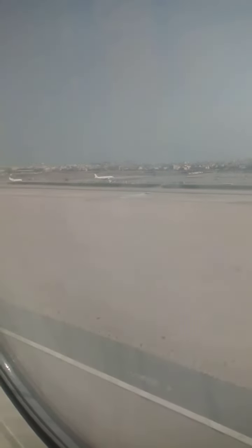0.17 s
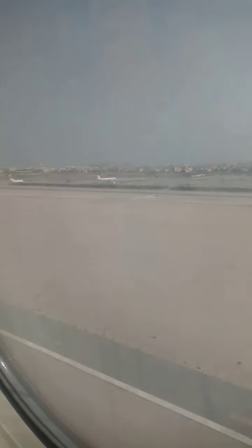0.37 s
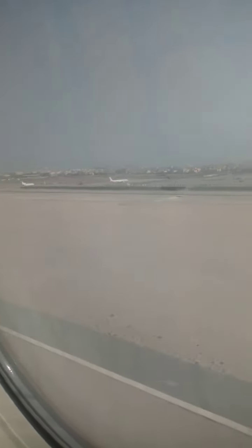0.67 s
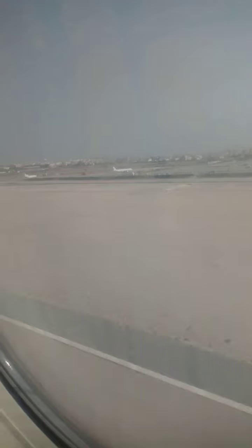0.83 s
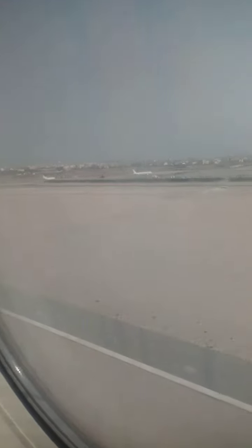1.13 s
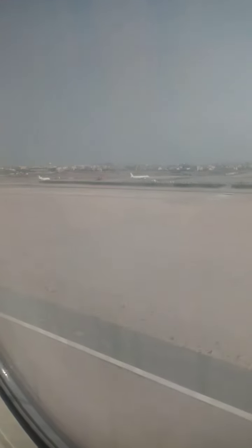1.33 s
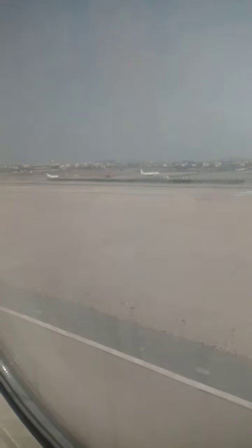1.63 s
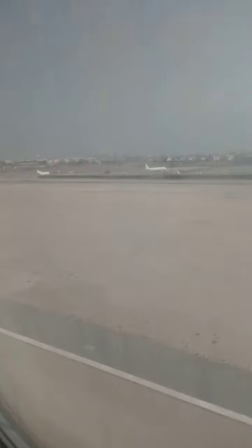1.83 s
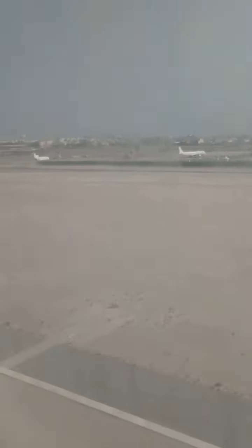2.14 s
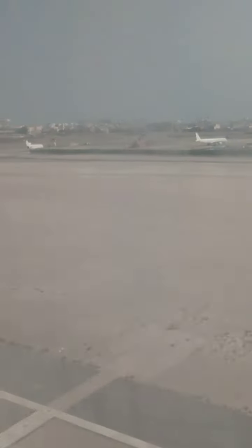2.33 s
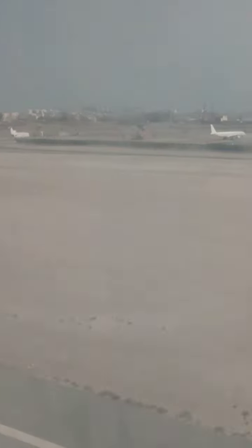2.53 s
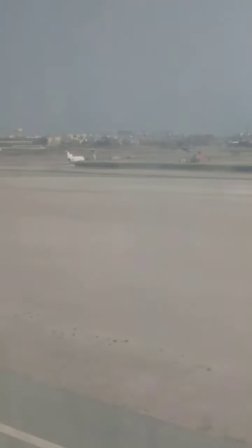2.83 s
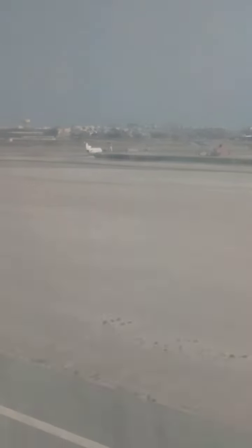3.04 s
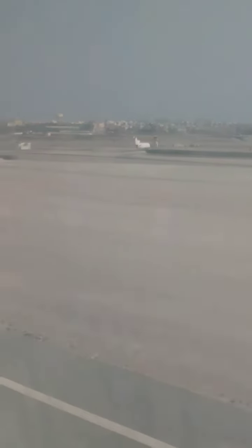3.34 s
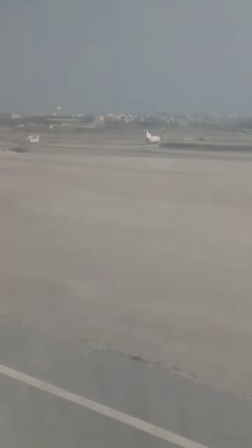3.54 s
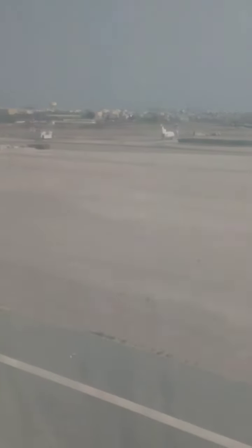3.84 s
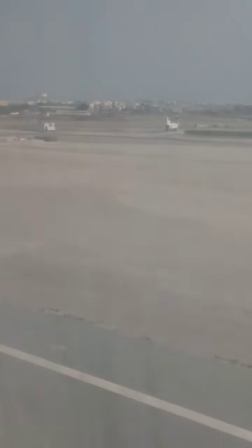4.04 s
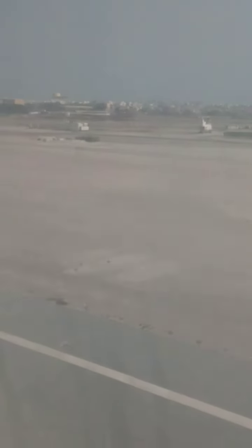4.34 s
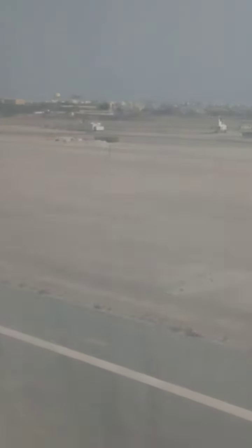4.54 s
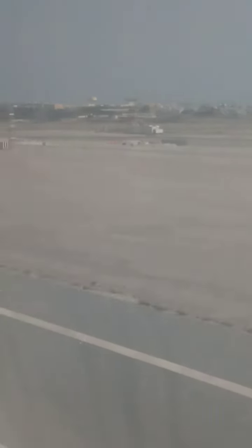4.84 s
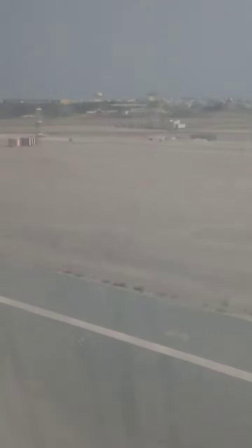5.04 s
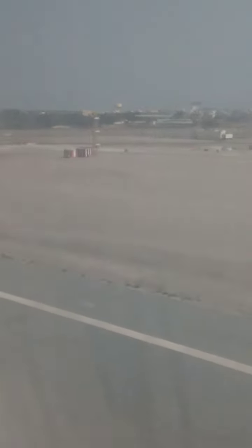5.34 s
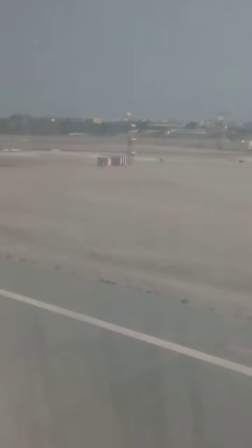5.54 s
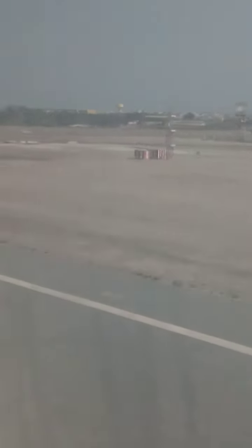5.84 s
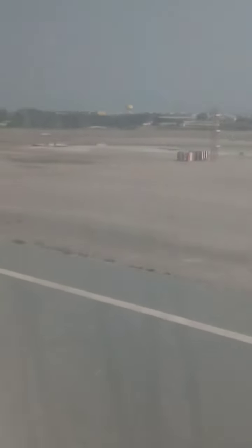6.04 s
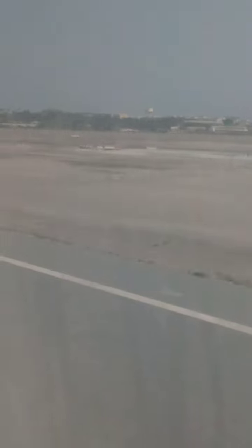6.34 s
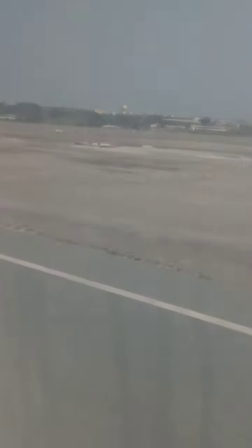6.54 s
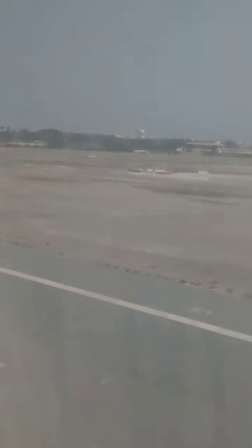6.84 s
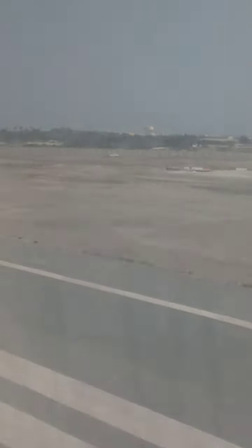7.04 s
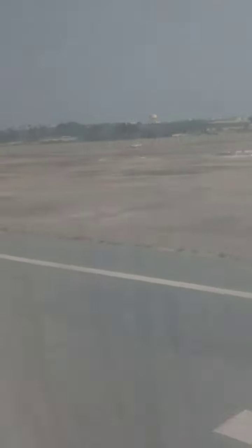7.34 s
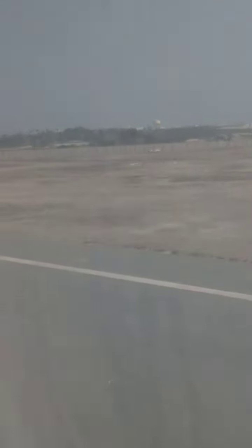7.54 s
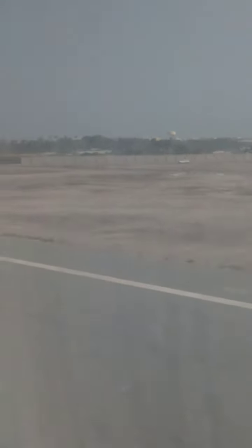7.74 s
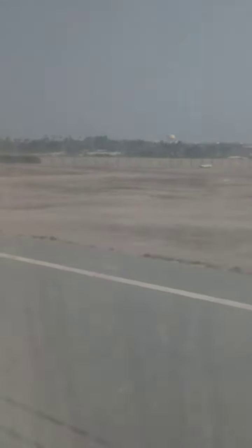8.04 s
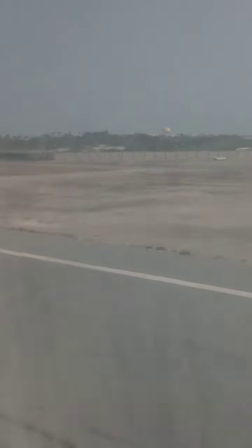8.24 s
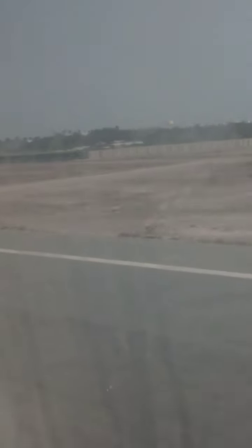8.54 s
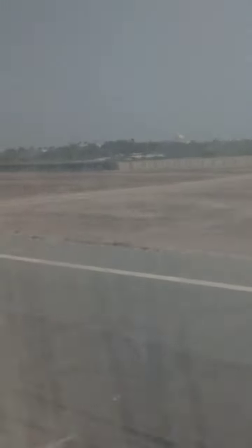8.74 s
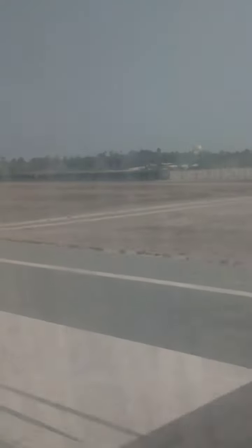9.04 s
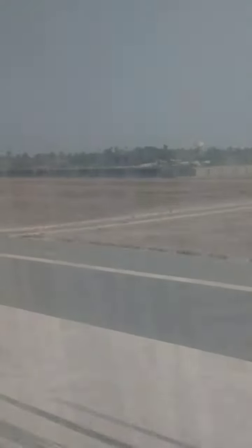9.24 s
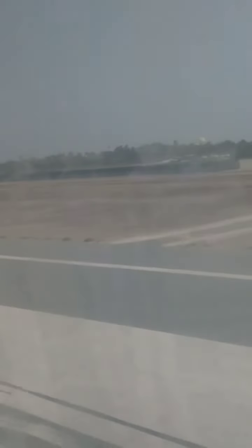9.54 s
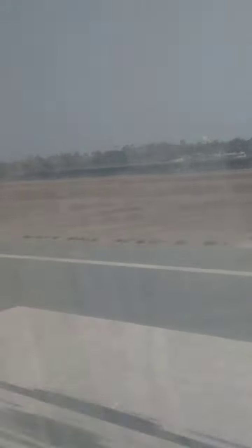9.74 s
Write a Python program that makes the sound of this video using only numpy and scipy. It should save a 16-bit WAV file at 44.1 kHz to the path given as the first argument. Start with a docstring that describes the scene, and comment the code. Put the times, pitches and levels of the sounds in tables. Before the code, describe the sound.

A phone at an airliner window seat picks up a steady, dull roar of wheels, engines and air through the cabin wall, with a low hum and faint wavering whine. Early on, fingers squeak on the phone, cloth rustles and panels knock. After six seconds the throttle closes, the hum drops and the whine slides slowly down.

```python
"""Inside an airliner rolling down the runway, heard on a phone held at a window seat.
From the start wheels, engines and air roar dully (coloured noise) over fan and core tones (wavering sines).
Soon plastic ticks and panels knock (decaying noise bursts), on and off until about eight seconds; early on,
fingers rub the phone and cloth slides (grainy noise with squeaks).
Past six seconds the throttle closes: the whine sinks."""
import sys
import numpy as np
from scipy import signal
from scipy.fft import rfft, irfft
from scipy.io import wavfile
from scipy.ndimage import map_coordinates

SR = 44100
rng = np.random.default_rng(int(sys.argv[2]) if len(sys.argv) > 2 else 0)


def pcm_store(signal):
    """Save signal as 16-bit PCM."""
    levels = np.round(np.clip(np.atleast_2d(signal), -1, 1) * 32767)
    wavfile.write(sys.argv[1], SR, levels.astype(np.int16).T)


N = 436590
T = np.arange(N) / SR
BINS_HZ = np.maximum(np.arange(N // 2 + 1) * SR / N, 1)

# Colour tables; only the shape counts, each noise gets its own level.
# roar through the cabin wall, body: freq_hz, density_db
BODY_COLOUR = [(10, -26), (32, -32.5), (47, -6.5), (63, -9.5), (85, -2), (125, -2.5), (150, -5),
               (200, -4.5), (240, -8), (335, -7.5), (385, -14.5), (500, -16.5), (700, -24), (1000, -33)]
# roar through the cabin wall, thin hiss above the body: freq_hz, density_db
WASH_COLOUR = [(500, -17.5), (700, -22.5), (1000, -30.5), (1250, -36.5), (1500, -45.5), (1680, -54),
               (1830, -64), (2600, -69), (3000, -74.5), (3900, -75), (5800, -78), (8000, -83),
               (13800, -84.5), (15300, -77.5)]
# cracking plastic: freq_hz, density_db
TICK_COLOUR = [(500, 2), (1000, 3.5), (1750, 9.5), (2200, -3), (2800, -4.5), (3300, -22), (4500, -25),
               (5500, -25), (7500, -33.5), (13500, -37), (15200, -18)]
# knocked cabin panel: freq_hz, density_db
THUD_COLOUR = [(100, -7.5), (250, 4), (650, 2), (1000, -8), (1400, -15), (1750, -21), (2100, -34.5),
               (2700, -38.5), (3500, -56.5), (6000, -73.5)]
# rubbed phone case: freq_hz, density_db
STROKE_COLOUR = [(900, -15), (1500, 6.5), (1850, -2), (2150, -1), (2300, -6), (2450, -0.5), (2800, -2),
                 (3150, -20.5), (3700, -10.5), (4400, -25), (5400, -23), (6200, -27.5), (7200, -39),
                 (14000, -35.5)]
# sliding fabric: freq_hz, density_db
RUSTLE_COLOUR = [(400, -0.5), (700, 5.5), (1100, 10), (1550, 6), (2000, -7.5), (2250, -11), (2800, -9.5),
                 (3150, -21.5), (3700, -33.5), (6000, -45), (15000, -45.5)]

# cabin air and panel resonances in the roar: centre_hz, width_hz, lift_db
CABIN_PEAKS = [(118.6, 14, 1.5), (182, 19, 3.5), (272, 32, 4), (352, 7.7, 2), (422, 49, 1), (518, 27, 1.5),
               (645, 27, 3), (844, 40, 1.5), (1257, 76, 3.5)]
# cabin resonances the whine sweeps through: centre_hz, width_hz, lift_db
WHINE_PEAKS = [(1632.5, 15, 16), (1410, 80, 13), (1267, 62, 24), (1025, 70, 5.5)]
# brief swells and dips of the low rumble and roar: start_s, length_s, rumble_lift_db, roar_lift_db
ROAR_SWELLS = [(0.416, 0.25, 2.3, -1), (0.717, 0.32, -3.5, 1), (1.233, 0.24, 2.5, 0),
               (2.148, 0.36, -0.5, 2), (3.752, 0.38, 3, 1.5), (4.152, 0.44, 1, 1),
               (4.653, 0.14, -2.5, -3.5), (5.3, 0.087, 0.5, 1), (6.24, .06, -2.5, 1.5), (7.1, 0.4, -2, 3),
               (8.154, 0.16, 4, -0.5), (8.325, 0.13, -5, -0.5), (8.774, .12, 2.5, -2), (9.248, 0.1, -6, 4),
               (9.423, .22, -1.5, -1.5)]
# swells of the rush's upper edge: start_s, length_s, lift_db
EDGE_SWELLS = [(4.55, .16, 4.5), (6.677, 0.058, 5.5), (6.86, 0.17, 2.5), (7.32, 0.23, 5.5)]
# plastic ticks: start_s, level_db, t60_s, snap_level_db
TICKS = [(.618, -56, 0.027, -86), (5.349, -53.5, 0.042, -82), (5.396, -63.5, .02, -83),
         (5.596, -68, .02, -91), (6.342, -65, .025, -79.5), (7.817, -58.5, 0.024, -75)]
# panel knocks: start_s, level_db, t60_s
KNOCKS = [(1.387, -23, .022), (1.864, -27.5, .022), (2.549, -25.5, .022), (5.349, -31, 0.027),
          (6.342, -36, 0.034)]
# finger strokes; last three levels relative to level_db, ring_hz reached at full pressure:
# start_s, length_s, level_db, rise_share, bright_db, ring_hz, ring_db, hiss_db, port_db
STROKES = [(0.682, 0.032, -54, .45, -1, 2340, -1, -27, -3.5),
           (0.707, 0.047, -56.5, 0.4, 1.5, 2550, -4, -26, -11),
           (0.744, .046, -55, 0.2, -3, 2400, -7, -20, -14),
           (0.79, 0.052, -54.5, .55, -5.5, 2150, -10.5, -28, -25),
           (0.837, .08, -60.5, .1, -6, 2650, -14, -23, -19),
           (2.688, 0.071, -65, 0.34, -4, 2750, -11, -27, -17),
           (2.847, 0.14, -71, .4, -3.5, 2300, -12, -21, -12)]
# cloth rubs; ring_db relative to level_db, ring_hz reached at full pressure:
# start_s, length_s, level_db, rise_share, bright_db, ring_hz, ring_db
RUSTLES = [(1.42, 0.19, -51.5, 0.57, -2, 2040, -14), (1.6, 0.16, -55, 0.6, -1, 2060, -14),
           (1.856, 0.046, -50, 0.3, 0, 2800, -15), (1.88, 0.088, -46, 0.4, 0, 2440, -12.5),
           (1.955, 0.14, -52, 0.1, -2.5, 1510, -7), (2.188, 0.16, -55, 0.7, -5, 2580, -19),
           (2.398, .05, -60, 0.5, -0.5, 1690, -2.5), (2.53, .09, -57.5, 0.4, -1, 1800, -11),
           (2.82, .2, -68.5, 0.46, -10, 1980, -4)]
# hardest shove against the panel: start_s, length_s, level_db
SHOVE = (1.865, .08, -38.5)

# rms levels before swells and buffeting; drift and buffeting are random spreads
WHEELS_DB, ENGINES_DB, AIR_DB = -28.0, -28.5, -44.5
DRIFT_DB, BUFFET_DB, EDGE_FLUTTER_DB = 0.04, 0.5, 1.94
# band edges of the roar
LOW_HZ, MID_HZ, HIGH_HZ, HISS_HZ, TREBLE_HZ = 160, 600, 1350, 1800, 3000
# blade-pass pitch, approached from SETTLE_SHARE below; COAST_S is the run-down time constant
FAN_HZ, SETTLE_SHARE, SETTLE_S = 1652, 0.019, 1.0
THROTTLE_BACK_S, EASE_S, COAST_S = 6.33, 0.15, 6.4
# whine at full speed before the resonances; the wall passes more as pitch sinks
WHINE_DB, WALL_DB_PER_OCTAVE = -84, 15
# core hum at the start, its slow fade, and its further drop after the throttle closes
CORE_HZ, CORE_DB, CORE_FADE_DB_PER_S, CORE_DROP_DB, CORE_DROP_S = 215.8, -34.5, 0.73, 11, 0.93
CORE_FOLLOW = 0.26  # core speed falls as this power of the fan's coast
SNAP_HZ, SNAP_WIDTH_HZ = 5400, 2200
# squeak pitch at first touch lies this share below ring_hz; spread of the uneven catching
PRESS_BEND, CATCH_DB = 0.15, 1
TOP_HZ = 15720


def undb(db):
    """Decibels to gain."""
    return 10 ** (np.asarray(db) / 20)


def unit(x):
    """Scale to rms 1."""
    return x / np.sqrt(np.mean(x ** 2))


def colour(points):
    """Gain per bin, interpolated over log frequency from (freq_hz, density_db)."""
    hz, db = np.transpose(points)
    return undb(np.interp(np.log(BINS_HZ), np.log(hz), db))


def shape(x, gain):
    """Filter by a gain per bin, without phase shift."""
    return irfft(rfft(x) * gain, N)


def below(hz, order=8):
    """Butterworth low-pass gain per bin."""
    return 1 / np.sqrt(1 + (BINS_HZ / hz) ** (2 * order))


def above(hz, order=8):
    """Power-complementary high-pass gain per bin."""
    return np.sqrt(1 - below(hz, order=order) ** 2)


def bell(hz, width_hz, at_hz=BINS_HZ):
    """Resonance curve, 1 at its centre."""
    return 1 / (1 + (2 * (at_hz - hz) / width_hz) ** 2)


def noise(gain):
    """Gaussian noise of a given colour, rms 1."""
    return unit(shape(rng.standard_normal(N), gain))


def walk(rate_hz):
    """Random curve of spread 1, swinging about rate_hz times a second."""
    steps = rng.standard_normal(size=8192)
    # sqrt(3/2) restores the spread lost between steps
    return np.sqrt(3 / 2) * np.interp(2 * rate_hz * T, np.arange(len(steps)), steps)


def swell(start_s, length_s, rise_share):
    """Envelope 0 to 1 to 0: builds for a share of its length, then lets go."""
    rise_share = np.clip(rise_share, 0.05, 0.95)
    peak_s = start_s + rise_share * length_s
    return np.interp(T, [start_s, peak_s, start_s + length_s], [0, 1, 0]) ** 0.53


def patchy(x, width_hz, rate_hz, spread_db):
    """Let each strip of the spectrum flicker on its own; rms 1."""
    hz, at_s, spectrum = signal.stft(x, SR, nperseg=512)
    rows, columns = np.meshgrid(hz / width_hz, at_s * rate_hz, indexing="ij")
    grid = rng.standard_normal((256, 1024))
    chance = map_coordinates(grid, [rows, columns], order=1, mode="wrap")
    flickered = signal.istft(spectrum * undb(spread_db * chance), SR)[1]
    return unit(flickered[:N])


def coasting():
    """Seconds since the throttle closed, easing in from zero."""
    return EASE_S * np.logaddexp(0, (T - THROTTLE_BACK_S) / EASE_S)


def fan_speed():
    """Share of full fan speed: settles, holds, then coasts down exponentially."""
    settling = 1 - SETTLE_SHARE * np.exp(-T / SETTLE_S)
    return settling * np.exp(-coasting() / COAST_S)


def cabin_gain():
    """Cabin air and panels ring: their lifts add in dB."""
    return undb(sum(lift_db * bell(hz, width_hz) for hz, width_hz, lift_db in CABIN_PEAKS))


def body_gain():
    """Wall-filtered body of the roar, lifted at the cabin resonances."""
    return colour(BODY_COLOUR) * cabin_gain()


def wash_gain():
    """Wall-filtered hiss of the roar, lifted at the cabin resonances."""
    return colour(WASH_COLOUR) * cabin_gain()


def wheels(drift_db):
    """Wheel rumble: lowest band of the roar, swelling, dipping and randomly buffeted."""
    swell_db = sum(rumble_db * swell(start_s, length_s, 0.34)
                   for start_s, length_s, rumble_db, _ in ROAR_SWELLS)
    rumble = noise(body_gain() * below(LOW_HZ))
    return rumble * undb(WHEELS_DB + swell_db + drift_db + BUFFET_DB * walk(9.5))


def engines(drift_db):
    """Engine roar: middle band of the body, swelling, dipping and randomly buffeted."""
    swell_db = sum(roar_db * swell(start_s, length_s, 0.34)
                   for start_s, length_s, _, roar_db in ROAR_SWELLS)
    roar = noise(body_gain() * above(LOW_HZ) * below(MID_HZ))
    return roar * undb(ENGINES_DB + swell_db + drift_db + BUFFET_DB * walk(6))


def air(drift_db):
    """Rushing air: patchy noise above the engine roar."""
    rush = noise(wash_gain() * above(MID_HZ) * below(HIGH_HZ, order=16))
    rush = patchy(rush, width_hz=90, rate_hz=18, spread_db=2.0)
    return rush * undb(AIR_DB + drift_db + 0.62 * walk(12))


def upper_rush():
    """Upper edge of the rush: unevenly flickering noise that weakens as the whine sinks."""
    edge = noise(wash_gain() * above(HIGH_HZ, order=16) * below(HISS_HZ, order=16))
    edge = patchy(edge, width_hz=90, rate_hz=20, spread_db=7)
    swell_db = sum(lift_db * swell(start_s, length_s, 0.35)
                   for start_s, length_s, lift_db in EDGE_SWELLS)
    return edge * undb(-63.5 + swell_db + EDGE_FLUTTER_DB * walk(15)) * fan_speed() ** 1.3


def hiss():
    """Thin hiss through the wall: lower part flickers, treble is steady."""
    lower = noise(wash_gain() * above(HISS_HZ, order=16) * below(TREBLE_HZ, order=16))
    lower = patchy(lower, width_hz=130, rate_hz=22, spread_db=4.0)
    treble = noise(wash_gain() * above(TREBLE_HZ, order=16))
    return lower * undb(-79.5 + 0.9 * walk(14)) + treble * undb(-83.0)


def tone(hz, level_db, waver_share, flutter_db):
    """Rotor line: a sine whose pitch and level waver, as through turbulence."""
    phase = 2 * np.pi * np.cumsum(hz * (1 + waver_share * walk(14))) / SR
    return np.sqrt(2) * np.sin(phase) * undb(level_db + flutter_db * walk(12))


def rotors():
    """Blade-pass whine, two lower orders of the fan shaft and the core hum."""
    speed, coast_s = fan_speed(), coasting()
    fan_hz = FAN_HZ * speed
    shaft_hz = fan_hz / 18
    peaks_db = sum(lift_db * bell(hz, width_hz, fan_hz) for hz, width_hz, lift_db in WHINE_PEAKS)
    whine_db = WHINE_DB - WALL_DB_PER_OCTAVE * np.log2(speed) + peaks_db
    core_hz = CORE_HZ * np.exp(-CORE_FOLLOW * coast_s / COAST_S)
    drop_db = CORE_DROP_DB * (1 - np.exp(-coast_s / CORE_DROP_S))
    core_db = CORE_DB - CORE_FADE_DB_PER_S * T - drop_db
    whine = tone(fan_hz, whine_db, waver_share=0.0018, flutter_db=3.5)
    # third shaft order; its level follows the core's
    drone = tone(3 * shaft_hz, core_db - 9.5, waver_share=0.012, flutter_db=3.5)
    # tenth shaft order sings out briefly as it sinks
    glide = tone(10 * shaft_hz, -53, waver_share=0.0068, flutter_db=1.0) * swell(6.7, 0.44, 0.42)
    core = tone(core_hz, core_db, waver_share=0.005, flutter_db=2.5)
    return whine + drone + glide + core


def blows(rows, gain):
    """Each (start_s, level_db, t60_s): one contact and a dying rattle through a coloured body."""
    force, rattle = np.zeros(N), rng.standard_normal(N)
    for start_s, level_db, t60_s in rows:
        first = int(start_s * SR)
        span = slice(first, first + SR // 10)
        decay = undb(level_db - 60 * (T[span] - T[first]) / t60_s)
        force[span] += decay * rattle[span]
        # the contact carries as much energy as the rattle
        force[first] += np.linalg.norm(decay)
    return shape(force, unit(gain))


def fittings():
    """Plastic fittings crack, each with a crisp snap on top."""
    crack_rows = [(start_s, level_db, t60_s) for start_s, level_db, t60_s, _ in TICKS]
    snap_rows = [(start_s, snap_db, t60_s) for start_s, _, t60_s, snap_db in TICKS]
    snap_gain = bell(SNAP_HZ, SNAP_WIDTH_HZ) ** 2
    return blows(crack_rows, colour(TICK_COLOUR)) + blows(snap_rows, snap_gain)


def friction(rows, points, grain_db, patchy_db):
    """Dense tiny slips under each stroke, catching unevenly; bright_db sets the upper slips."""
    slips = rng.standard_normal(N) * undb(grain_db * walk(260) + CATCH_DB * walk(40))
    # the contact point wanders, so the colour keeps shifting
    rub = patchy(shape(slips, colour(points)), width_hz=150, rate_hz=45, spread_db=patchy_db)
    upper = shape(rub, above(2100, order=3) ** 2)
    out = np.zeros(N)
    for start_s, length_s, level_db, rise_share, bright_db, *_ in rows:
        pressure = swell(start_s, length_s, rise_share)
        out += pressure * undb(level_db) * (rub + (undb(bright_db) - 1) * upper)
    return out


def squeaks(rows):
    """Each rub scrapes at its own resonance, whose pitch follows the pressure."""
    out = np.zeros(N)
    for start_s, length_s, level_db, rise_share, _, ring_hz, ring_db, *_ in rows:
        pressure = swell(start_s, length_s, rise_share)
        on = pressure > 0
        pitch_hz = ring_hz * (1 + PRESS_BEND * (pressure[on] - 1))
        phase = 2 * np.pi * np.cumsum(pitch_hz) / SR
        out[on] += pressure[on] * undb(level_db + ring_db) * np.sin(phase)
    # random swing in strength and sign roughens the sines
    return np.sqrt(2) * walk(170) * out


def handling():
    """Fingers rub the case with squeak and thin hiss and, so near, ring the microphone's tiny port."""
    port = noise(bell(15350, 800) ** 1.5) * undb(2.2 * walk(200))
    skin = noise(bell(5450, 900) ** 2) * undb(3.3 * walk(120))
    treble = np.zeros(N)
    for start_s, length_s, level_db, rise_share, *_, hiss_db, port_db in STROKES:
        pressure = swell(start_s, length_s, rise_share)
        treble += pressure * (undb(level_db + hiss_db) * skin + undb(level_db + port_db) * port)
    rub = friction(STROKES, STROKE_COLOUR, grain_db=3.0, patchy_db=4.0)
    return treble + squeaks(STROKES) + rub


def panels():
    """Cabin panels knock dully: short rattles through a low body."""
    return blows(KNOCKS, colour(THUD_COLOUR))


def cloth():
    """Fabric slides over the seat; the hardest shove also makes the panel shudder."""
    start_s, length_s, level_db = SHOVE
    shudder = noise(bell(590, 450) ** 2) * undb(level_db + 2.5 * walk(90))
    shudder = shudder * swell(start_s, length_s, 0.35)
    rub = friction(RUSTLES, RUSTLE_COLOUR, grain_db=2, patchy_db=4.0)
    return shudder + squeaks(RUSTLES) + rub


def scene():
    """Everything heard at the seat, one channel."""
    drift_db = DRIFT_DB * walk(1)  # shared by wheels, engines and air
    roar = wheels(drift_db) + engines(drift_db) + air(drift_db) + upper_rush() + hiss()
    return (roar + rotors() + fittings() + handling() + panels() + cloth())[None]


def record(dry):
    """The phone cuts the very top: steep elliptic low-pass."""
    return signal.sosfilt(signal.ellip(10, 0.2, 80, TOP_HZ, fs=SR, output="sos"), dry)


dry = scene()
out = record(dry)
pcm_store(out)
```